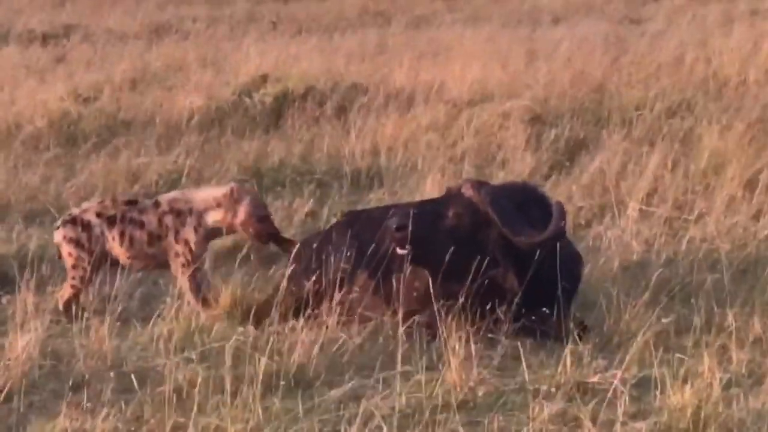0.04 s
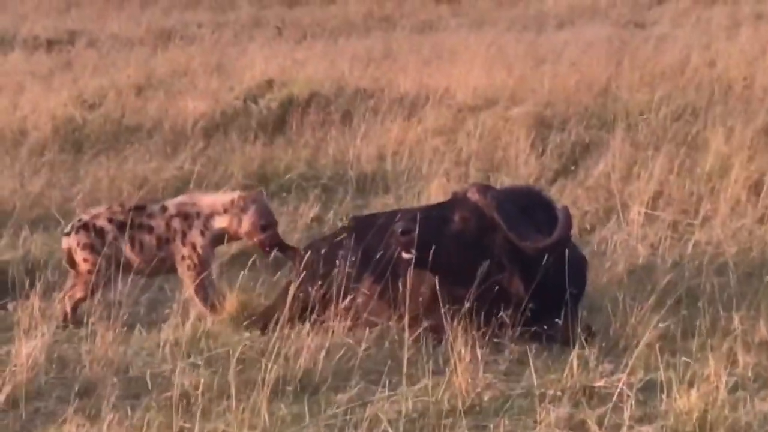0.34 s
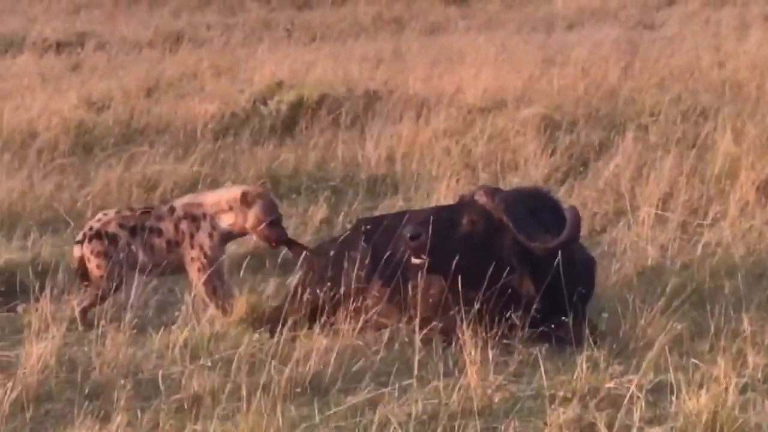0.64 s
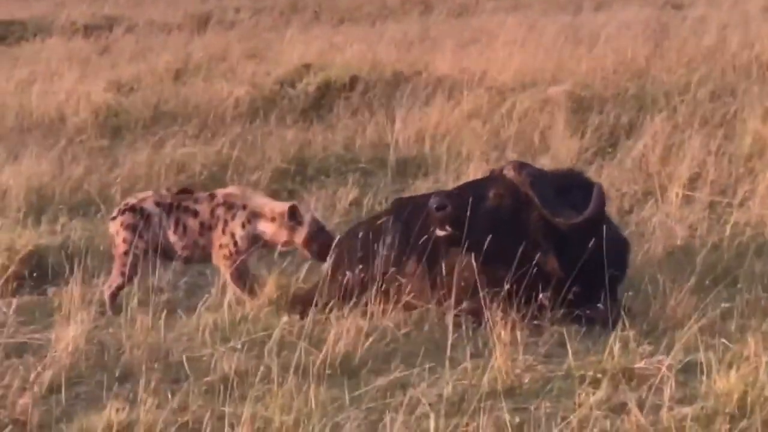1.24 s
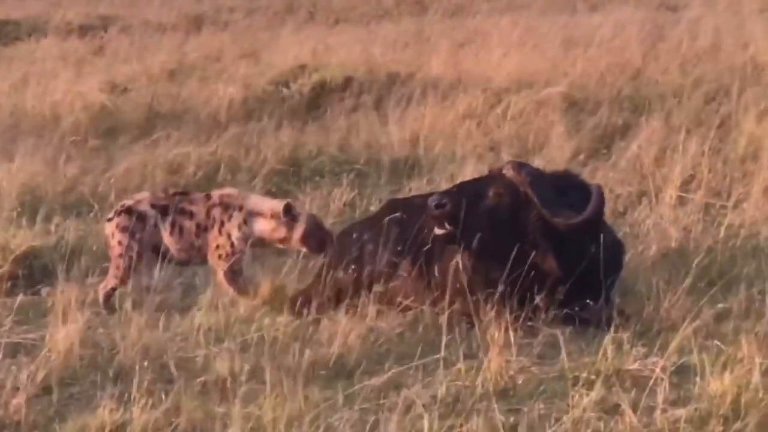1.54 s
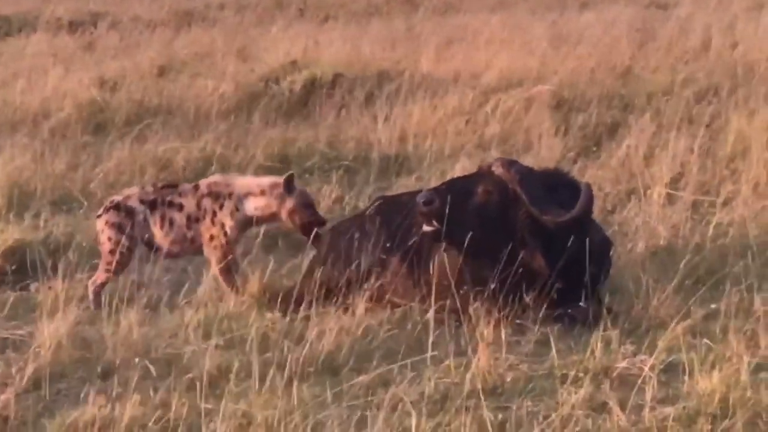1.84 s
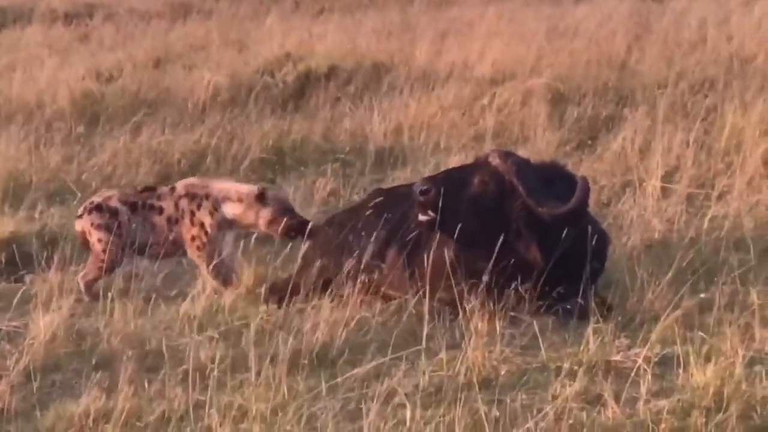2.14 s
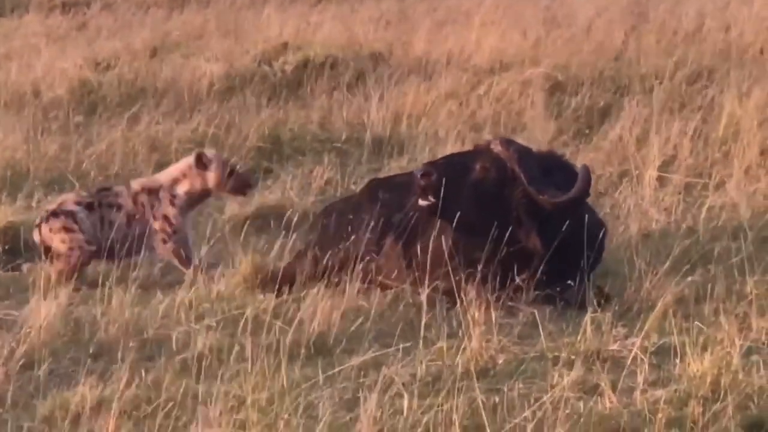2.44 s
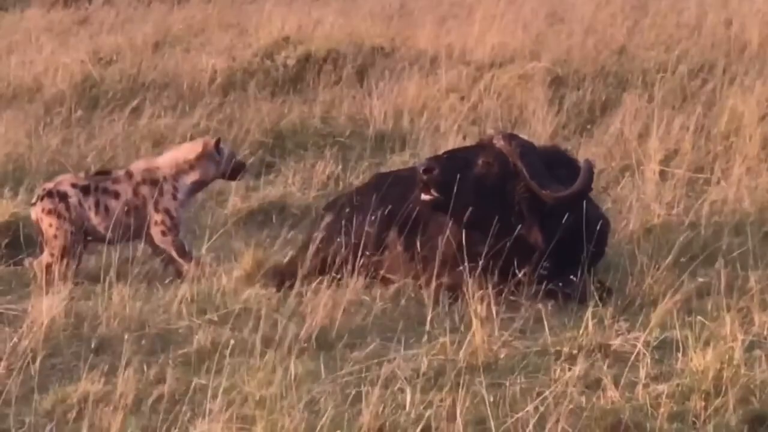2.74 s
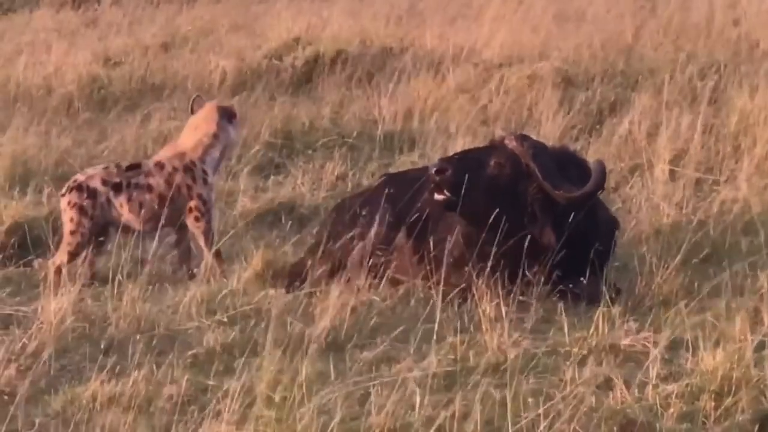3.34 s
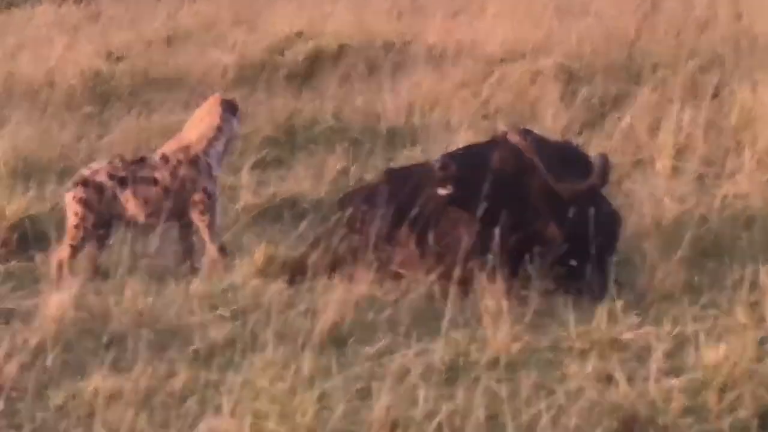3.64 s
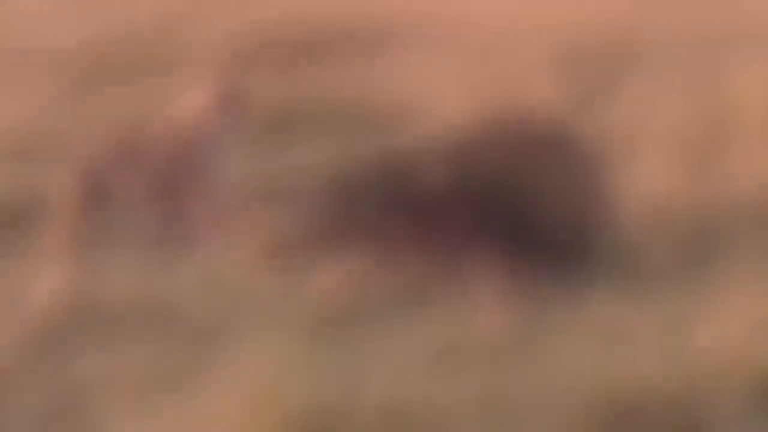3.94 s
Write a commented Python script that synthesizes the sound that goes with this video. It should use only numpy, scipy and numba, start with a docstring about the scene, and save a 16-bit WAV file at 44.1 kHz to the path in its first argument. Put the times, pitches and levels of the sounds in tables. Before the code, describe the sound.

A buffalo gives one long, low bellow while wind buffets the microphone.

```python
"""Dry grassland: a lying buffalo gives one long bellow. Slow glottal pulses speed up, hold and run down
into a creak, ringing a deep throat resonance and a cluster of nasal ones. A faint creak follows.
Wind buffets the microphone with gusts and single eddies. A small bird chips, dry stalks rustle
and something calls far away over a faint hiss of air and grass."""
import sys
import numpy as np
from scipy import signal
from scipy.fft import irfft
from scipy.io import wavfile
from scipy.ndimage import uniform_filter1d
from numba import njit

SR = 44100
rng = np.random.default_rng(int(sys.argv[2]) if len(sys.argv) > 2 else 0)


def master_out(mix):
    """Clip the mix to full scale and print it as 16-bit PCM to the path in sys.argv[1]."""
    frames = np.transpose(np.atleast_2d(mix))
    ceiling = np.clip(frames, -1, 1)
    pcm = np.round(ceiling * 32767).astype(np.int16)
    wavfile.write(sys.argv[1], SR, pcm)


N = 176400
T = np.arange(N) / SR


def undb(db):
    """Decibels to gain."""
    return 10 ** (np.asarray(db) / 20)


def unit(x):
    """Scale to rms 1."""
    return x / np.sqrt(np.mean(x ** 2) + 1e-20)


def curves(table):
    """Columns after the first, interpolated over time."""
    rows = np.array(table, float)
    return [np.interp(T, rows[:, 0], col) for col in rows.T[1:]]


def swell(centre_s, sigma_s):
    """Gaussian envelope, peak 1."""
    return np.exp(-np.minimum(((T - centre_s) / sigma_s) ** 2 / 2, 50))


def cut(x, hz, kind, order=2):
    """Butterworth filter."""
    return signal.sosfilt(signal.butter(order, hz, kind, fs=SR, output="sos"), x)


def noise(gain, size=N):
    """Noise with spectrum gain(Hz), rms 1."""
    hz = np.maximum(np.fft.rfftfreq(size, 1 / SR), 1)
    return unit(irfft(gain(hz) * np.exp(2j * np.pi * rng.random(len(hz))), size))


@njit
def resonate(x, hz, width_hz):
    """Complex one-pole resonator, tuned per sample."""
    y, z = np.empty(len(x), np.complex128), 0j
    for i in range(len(x)):
        z = z * np.exp((2j * np.pi * hz[i] - np.pi * width_hz) / SR) + x[i] + 1e-18
        y[i] = z * 2 * np.pi * width_hz / SR
    return y


def ring(x, hz, width_hz):
    """One resonance, steady or moving."""
    return resonate(x, hz + np.zeros(N), float(width_hz))


def tube(x, modes):
    """Resonances in series, each lifting its own band."""
    for hz, width_hz, db in modes:
        x = x + (undb(db) - 1) * ring(x, hz, width_hz).real
    return x


def bellow():
    """Glottal pulses ring throat and nasal tube; three registers swell separately."""
    # register rms (time [s], throat [dB], lower nasal [dB], upper nasal [dB])
    effort = [(.555,-48.5,-68.5,-87),(0.589,-44.5,-53,-81),(.635,-38.5,-45.5,-79),(0.729,-35.5,-45.5,-78),(.79,-37,-51.5,-76),(.84,-38.5,-49,-59.5),(0.901,-40.5,-48,-76),(.96,-37,-46,-61.5),(1.2,-38.5,-48,-69),(1.55,-41,-50.5,-67),(1.9,-39,-50,-70),(2.2,-36.5,-52.5,-63),(2.4,-38.5,-52,-61),(2.561,-35.5,-50,-64),(2.801,-40,-52,-66),(2.95,-39.5,-52.5,-73.5),(3.06,-36,-56,-88.5),(3.129,-37,-51.5,-68.5),(3.22,-44.5,-54,-66.5),(3.32,-44,-57.5,-64),(3.421,-54.5,-56.5,-66),(3.46,-53,-67.5,-71)]
    # brief high resonances (time [s], sigma [s], centre [Hz], width [Hz], level [dB])
    high_modes = [(0.717,0.052,2220,200,-74),(0.976,0.14,2160,300,-82.5),(1.337,0.14,3680,585,-81.5)]
    pulses, pulse_idx = glottis()
    out = 0
    for register, db in zip(vocal_tract(pulses), curves(effort)):
        power = uniform_filter1d(uniform_filter1d(register ** 2, size=2600), size=2000)
        inverse_rms = np.interp(T, T[pulse_idx], (power[pulse_idx] + 1e-20) ** -.5)
        out = out + undb(db) * register * inverse_rms
    for at_s, sigma_s, hz, width_hz, db in high_modes:
        band = ring(ring(pulses, hz, width_hz).real, hz, width_hz).real
        out = out + undb(db) * swell(at_s, sigma_s) * unit(band)
    return out


def glottis():
    """Nearly even vocal-fold pulses with a trace of rasp; also returns their sample indices."""
    # fold vibration (time [s], rate [Hz])
    pitch = [(0.55, 35.26), (0.63, 43.59), (0.72, 53.3), (0.86, 62.68), (1.0, 69.19), (1.12, 72.2),
             (1.3, 74.38), (1.6, 79.2), (1.85, 80.38), (2.02, 83.85), (2.25, 83.07), (2.47, 83.9),
             (2.65, 81.89), (2.85, 82.22), (3.02, 79.95), (3.2, 69.9), (3.33, 58.95), (3.39, 44.49),
             (3.47, 25.76)]
    start_cycles, jitter_s, shimmer_db = .65, .00003, .45
    rate_hz, = curves(pitch)
    voiced = (T >= pitch[0][0]) * (T < pitch[-1][0])
    phase = start_cycles + np.cumsum(rate_hz * voiced) / SR
    cycles = np.arange(1, int(phase[-1]) + 1)
    jitter, shimmer = rng.standard_normal((len(cycles), 2)).T
    pulse_idx = np.searchsorted(phase, cycles) + (jitter_s * SR * jitter).astype(int)
    rasp = .014 * np.exp(-2 * (phase % 1)) * rng.standard_normal(N) * voiced
    return np.bincount(pulse_idx, undb(shimmer_db * shimmer), N) + rasp, pulse_idx


def vocal_tract(pulses):
    """Throat and nose resonances shape the pulses into throat, lower and upper nasal registers."""
    # resonances moving with the mouth (time [s], throat [Hz], nasal [Hz], mouth [Hz], mouth boost [dB])
    shape = [(.56,216,1113,1444,11.5),(.72,213.5,1110,1484,18.5),(.82,227,1123,1295,7),(.95,220.4,1148,1225,12),(1.3,205,1139,1212,9),(1.8,237.2,1103,1201,8.5),(2.3,247.5,1108,1190,12),(2.9,235,1125,1220,11.5),(3.1,229.5,1193,1251,7.5),(3.33,232,1198,1255,12.5),(3.38,207,1133,1450,12),(3.45,229.5,1150,1730,10)]
    # steady resonances (centre [Hz], width [Hz], boost [dB])
    throat_modes = [(168,90,2),(287,100,1.2),(590,35,21)]
    nose_modes = [(905,70,10),(1345,70,7),(1505,60,4),(1675,65,8),(1835,70,4)]
    chest_hz, muzzle_hz, split_hz = 57, 1840, 1400
    throat_hz, nasal_hz, mouth_hz, mouth_db = curves(shape)
    throat = -tube(ring(pulses, throat_hz, width_hz=22.1).imag, throat_modes)
    throat = cut(cut(throat, chest_hz, "high"), 406, "low", order=3)
    nasal = cut(cut(pulses, 917, "high", order=4), muzzle_hz, "low", order=10)
    nasal = tube(nasal, nose_modes + [(nasal_hz, 37, 14.5), (mouth_hz, 46, mouth_db)])
    lower, upper = (cut(cut(nasal, split_hz, kind, order=4), split_hz, kind, order=4)
                    for kind in ("low", "high"))
    return throat, lower, upper


def creak():
    """A faint pulsed creak swells in the throat at the end."""
    # parallel resonances (centre [Hz], width [Hz], relative gain [dB])
    modes = [(226.5,24,19.5),(1088,50,8),(1500,160,-32),(2050,200,-40)]
    rate_hz, level_db = 71.2, -56.5
    pulses = np.diff(np.floor(T * rate_hz), prepend=0)
    rasp = .017 * rng.standard_normal(N)
    voice = sum(undb(db) * ring(pulses + rasp, hz, width_hz).real for hz, width_hz, db in modes)
    return undb(level_db) * swell(centre_s=3.99, sigma_s=.068) * unit(cut(voice, 2440, "low", order=6))


def wind(size=32768):
    """Separate gusts on the microphone, the sharp ones brighter, over a light breeze."""
    # (time [s], sigma [s], level [dB], corner [Hz])
    gusts = [(.005,0.0098,-20,95),(.045,0.0088,-40.5,106.5),(0.066,0.0053,-22,414),(.085,0.022,-34,107),(0.126,0.018,-24.5,153.5),(0.181,0.0047,-32.5,560),(0.21,0.012,-28,480),(0.219,0.0023,-36.5,714),(0.246,0.01,-25.5,240),(0.277,0.0065,-27.5,258),(.305,0.0073,-26,117),(0.379,0.014,-35.5,126),(.47,0.017,-39,120),(.516,0.0023,-32,418),(0.534,0.011,-34.5,159),(0.554,0.011,-32.5,100),(.67,0.016,-37.5,71),(.816,0.0028,-33.5,380),(.845,0.011,-31.5,120),(1.77,0.033,-39.5,97),(1.878,.035,-42,100.5),(1.978,0.021,-40.5,100),(2.019,0.0036,-28.5,270),(2.077,0.075,-31.5,134.5),(2.136,0.0044,-26,270),(2.157,0.003,-28.5,270),(2.235,.007,-39.5,300),(2.257,0.0094,-26.5,190),(2.552,0.063,-44,90),(2.61,0.0082,-23,265),(2.681,0.12,-35,101.5),(2.753,0.011,-28,91),(2.817,0.0069,-31.5,394),(2.836,0.02,-26.5,150),(2.87,0.0046,-43,420),(3.043,0.027,-32,90),(3.397,0.017,-33.5,106.4),(3.584,0.023,-31,86.4),(3.686,0.0095,-36,70),(3.726,0.0092,-35,101),(3.778,0.0096,-26.5,90),(3.807,0.0091,-32.5,241),(3.825,0.023,-36.5,92)]
    # (time [s], level [dB])
    breeze = [(0,-19),(.35,-38.5),(.8,-46.5),(1.0,-53),(1.65,-54),(2.15,-35),(2.4,-52),(2.8,-41),(3.2,-58.5),(3.55,-44),(4,-49)]
    out = np.pad(turbulence(corner_hz=88) * undb(curves(breeze)[0]), size)
    t = (np.arange(size) - size // 2) / SR
    for at_s, sigma_s, db, corner_hz in gusts:
        envelope = np.exp(-(t / sigma_s) ** 2 / 2)
        gust = unit(cut(turbulence(corner_hz, size) * envelope, 45, "high"))
        start = int(at_s * SR) + size // 2
        out[start:start + size] += undb(db) * gust * np.sqrt(np.mean(envelope ** 2))
    return out[size:-size]


def turbulence(corner_hz, size=N):
    """Pressure noise of eddies: a low band, falling ever faster above the corner."""
    low_hz, order, steepen_hz = 42.6, 3.16, 2.8 * corner_hz

    def gain(hz):
        power = 1 / (1 + (low_hz / hz) ** 4) / (1 + (hz / corner_hz) ** (2 * order))
        return np.sqrt(power) * np.exp(-(hz / steepen_hz) ** 2 / 2)
    return noise(gain, size)


def eddies():
    """A passing eddy sucks, then pushes on the microphone: a dull knock."""
    # (time [s], sigma [s], peak before high-pass [dB])
    knocks = [(.0638,0.00092,-16.5),(0.0665,0.00024,-32.5),(.0688,0.00068,-19),(0.1795,0.00032,-34.5),(0.192,.0005,-22.5),(0.2027,0.0016,-15),(0.2179,0.00031,-22),(0.2247,.0004,-22.5),(0.24,0.0028,-16.5),(0.273,0.00053,-33.5),(.5135,.0005,-29.5),(.829,0.0024,-21),(2.2318,0.0018,-16.5),(2.6133,0.0022,-12),(2.832,0.003,-20),(3.798,0.0012,-23.5)]
    pressure = sum(undb(db) * np.sqrt(np.e) * (T - at_s) / sigma_s * swell(at_s, sigma_s)
                   for at_s, sigma_s, db in knocks)
    return cut(pressure, 27, "high")


def bird():
    """Thin chips, each sliding down to nearly the same pitch."""
    # (time [s], level [dB])
    chips = [(.04,-81.5),(.335,-87),(.495,-82),(1.93,-79),(2.083,-76),(2.23,-75),(2.38,-84),(2.718,-80.5),(2.869,-82),(3.03,-87.5),(3.182,-74.5),(3.342,-81),(3.65,-77),(3.803,-79.5),(3.954,-74)]
    end_hz, drop_hz, glide_s, length_s = 7100, 1100, .008, .032
    out, t = np.zeros(N + SR), np.arange(int(length_s * SR)) / SR
    for at_s, db in chips:
        hz = end_hz * (1 + .008 * rng.standard_normal()) + drop_hz * np.exp(-t / glide_s)
        chip = np.hanning(len(t)) * np.sin(2 * np.pi * np.cumsum(hz) / SR)
        start = int(at_s * SR)
        out[start:start + len(t)] += undb(db) * chip
    return out[:N]


def far_call():
    """One distant pure tone that rises and falls."""
    # (time [s], pitch [Hz], level [dB])
    call = [(3.74,880,-87),(3.8,960,-75),(3.86,976,-65),(3.92,910,-72),(3.96,880,-92)]
    hz, db = curves(call)
    sounding = (T > call[0][0]) * (T < call[-1][0])
    return undb(db) * np.sin(2 * np.pi * np.cumsum(hz) / SR) * sounding


def grass():
    """Dry stalks rustle in short bursts of grainy noise."""
    # (time [s], sigma [s], level [dB])
    rustles = [(0.47,.02,-75.5),(.545,0.0053,-76),(1.614,.1,-77.5),(1.84,0.012,-76.5),(2.302,0.0034,-72.5),(2.328,0.0015,-74.5),(2.633,.03,-73.5),(3.248,0.031,-86),(3.716,.006,-77)]
    grains = rng.standard_normal(N) * rng.exponential(size=N)
    stalks = unit(cut(cut(grains, 1800, "high"), 4800, "low"))
    return stalks * sum(undb(db) * swell(at_s, sigma_s) for at_s, sigma_s, db in rustles)


def air():
    """Nearly steady hiss of far air and grass."""
    # (frequency [Hz], relative density [dB])
    spectrum = [(100,-1),(400,5),(1000,-1.5),(1600,-3.5),(2500,-13),(4000,-16.5),(5500,-20.5),(8000,-22.5),(9800,-34),(12000,-28),(15000,-42)]
    # (time [s], level [dB])
    level = [(0,-72),(.5,-69.5),(1.2,-66.5),(2.6,-67.5),(3.6,-67.5),(4,-69)]
    band_hz, band_db = np.array(spectrum, float).T
    hiss = noise(lambda hz: undb(np.interp(np.log(hz), np.log(band_hz), band_db)))
    return undb(curves(level)[0]) * hiss


def scene():
    """All sources at one microphone."""
    return (bellow() + wind() + eddies() + bird() + air() + grass() + far_call() + creak())[None]


def record(dry):
    """Band limit: 29 Hz to 15 kHz."""
    dry = cut(dry, 29, "high", order=4)
    return signal.sosfilt(signal.ellip(8, .2, 70, 15000, fs=SR, output="sos"), dry)


dry = scene()
out = record(dry)
master_out(out)
```